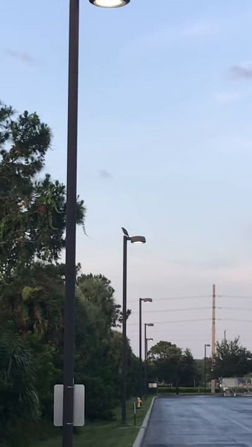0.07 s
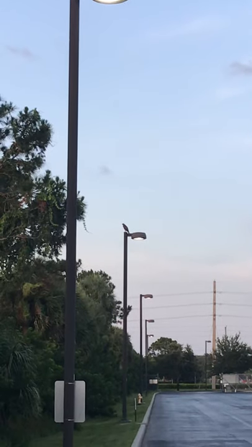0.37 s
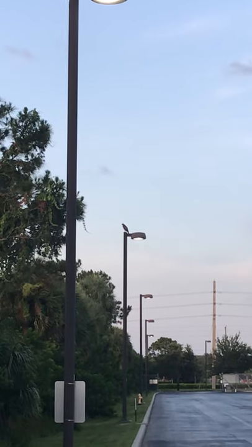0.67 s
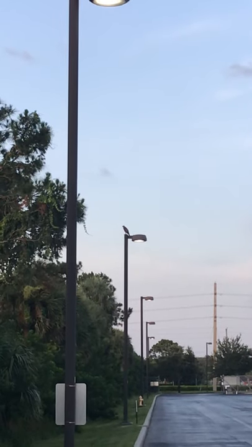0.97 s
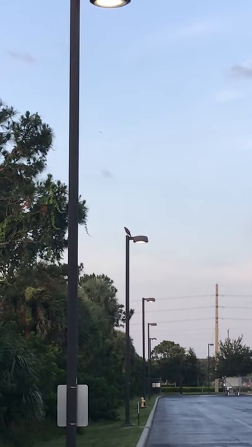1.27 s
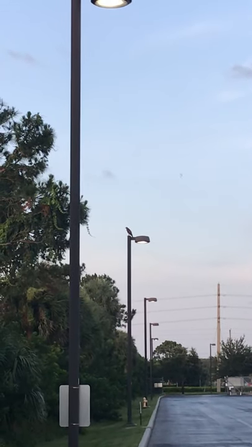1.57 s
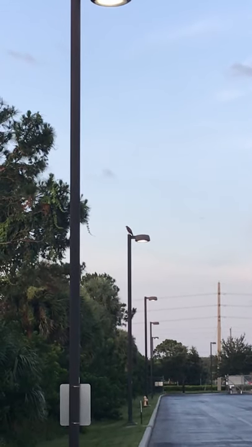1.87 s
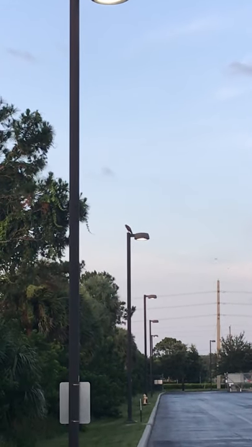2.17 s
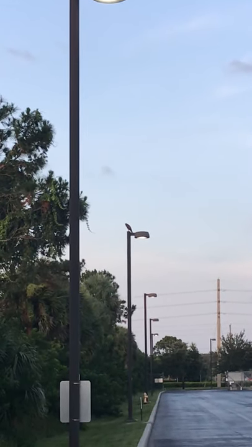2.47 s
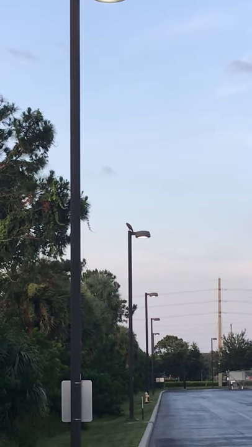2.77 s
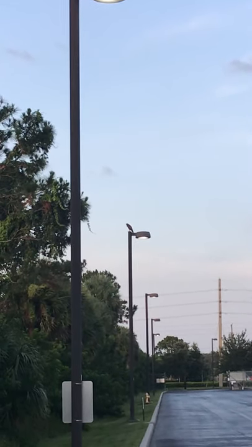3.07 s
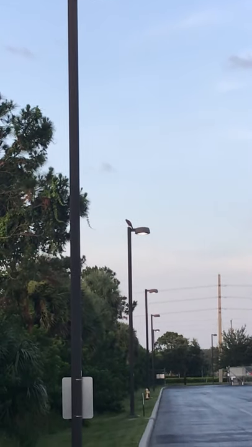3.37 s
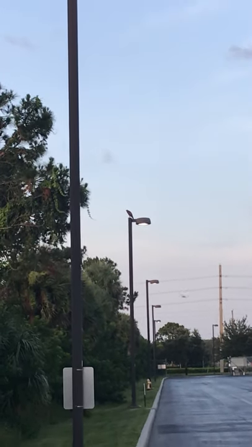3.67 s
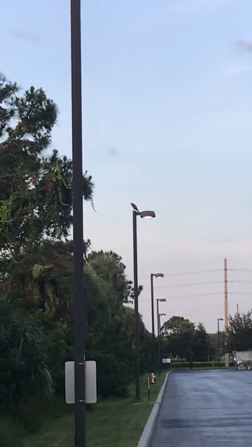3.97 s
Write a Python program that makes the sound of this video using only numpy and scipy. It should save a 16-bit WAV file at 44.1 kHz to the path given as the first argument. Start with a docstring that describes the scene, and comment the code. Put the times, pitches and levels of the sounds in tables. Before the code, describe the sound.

In an outdoor parking area, small birds give falling whistles and short chirps, then a hawk lets out one long, raspy scream. The calls echo lightly off the trees while distant traffic rumbles and a machine hums.

```python
"""Small birds slur, chip and rasp in the trees by a parking area; then a hawk screams from a lamp post.
Its one long scream is a clear upward yelp that breaks into a hoarse hiss, coloured by the bounce
off the asphalt. The birds are falling whistles and buzzing noise, and all calls echo off the trees.
Distant traffic rumbles, an engine drones and a machine hums under it all, in mono."""
import sys
import numpy as np
from scipy import signal
from scipy.fft import rfft, irfft
from scipy.io import wavfile
from scipy.ndimage import map_coordinates

SR = 44100
rng = np.random.default_rng(int(sys.argv[2]) if len(sys.argv) > 2 else 0)


def file_out(sig):
    """Save sig as 16-bit WAV at sys.argv[1]."""
    # one column per channel
    cols = np.atleast_2d(sig).T
    # limit, then scale
    lim = np.clip(cols, -1, 1)
    pcm = np.round(lim * 32767).astype(np.int16)
    wavfile.write(sys.argv[1], SR, pcm)


N = 176400
T = np.arange(N) / SR


def amp(db):
    """Decibels to gain."""
    return 10 ** (np.asarray(db) / 20)


def unit(x):
    """Scales to rms 1."""
    return x / np.sqrt(np.mean(x ** 2) + 1e-20)


def curve(rows, t):
    """Each column after the first, linearly interpolated at t."""
    at, *columns = np.transpose(rows)
    return [np.interp(t, at, column) for column in columns]


def at_freq(points, hz):
    """Interpolates a table on a log-frequency axis."""
    freq_hz, value = np.transpose(points)
    return np.interp(np.log(hz + 1), np.log(freq_hz), value)


def noise(spectrum, tilt_db_per_octave=0):
    """Noise of rms 1 with the given spectral shape."""
    hz = np.fft.rfftfreq(N, 1 / SR)
    gain = amp(at_freq(spectrum, hz) + tilt_db_per_octave * np.log2(hz + 1))
    return unit(irfft(rfft(rng.standard_normal(N)) * gain, N))


def drift(rate_hz):
    """Random motion of rms 1, up to about the given rate."""
    hz = np.fft.rfftfreq(N, 1 / SR)
    return unit(irfft(rfft(rng.standard_normal(N)) / np.sqrt(1 + (hz / rate_hz) ** 4), N))


def phase(hz):
    """Running phase of a frequency curve."""
    return 2 * np.pi * np.cumsum(hz) / SR


def band(hz, width_hz):
    """Noise in a resonance that follows a frequency curve."""
    envelope = (drift(width_hz / 2) + 1j * drift(width_hz / 2))[:len(hz)]
    return unit((envelope * np.exp(1j * phase(hz))).real)


def add(mix, start_s, sound):
    """Mixes a sound in at its start time."""
    part = mix[max(round(start_s * SR), 0):][:len(sound)]
    part += sound[:len(part)]


# voice harmonics, fundamental first: gain_db
HARMONICS_DB = [3, -13.5, -30, -63]
# second syrinx tone in the yelp: time_s, pitch_hz, gain_db
SECOND_TONE = [(2.24, 2190, -22), (2.28, 2110, -14), (2.32, 1880, -8), (2.35, 1670, -11), (2.39, 1540, -40)]


def hawk_voice(pitch_hz, roughness, hoarse):
    """The syrinx: a jittering whistle, with stronger overtones and brief sum tones in the yelp."""
    jitter, wobble = 0.04 * drift(rate_hz=461), 0.011 * drift(rate_hz=48.6)
    main_phase = phase(pitch_hz * (1 + roughness * (jitter + wobble)))
    overtone_gain = amp(6.5 * (1 - hoarse)) * (1 + 0.32 * hoarse * drift(rate_hz=35))
    harmonics = sum(amp(db) * (overtone_gain if k else 1) * np.sin((k + 1) * main_phase)
                    for k, db in enumerate(HARMONICS_DB))
    second_hz, second_db = curve(SECOND_TONE, T)
    second_phase = phase(second_hz * (1 + 0.065 * drift(rate_hz=570)))
    sum_tones = sum(amp(db + second_db) * np.sin(harmonic * main_phase + second_phase)
                    for harmonic, db in [(1, 1), (2, -6)])
    return unit(harmonics + sum_tones)


# scream contour: time_s, pitch_hz, voice_db, hiss_db, roughness_ratio
SCREAM = [(2.22, 2350, -76, -82, 0.26), (2.245, 3023, -42, -49.5, 0.37), (2.27, 3188, -40, -45, 0.2),
          (2.303, 3246, -35.5, -47.5, 0), (2.325, 3189, -50.5, -47, 0.04), (2.355, 3092, -37, -51.5, 0.2),
          (2.385, 3011, -49, -51.5, 0.84), (2.55, 3041, -50, -55, 0.65), (2.72, 3047, -50, -55.5, .7),
          (2.82, 3080, -43, -56, 0.37), (2.93, 3053, -45.5, -55, 0.47), (3.1, 3065, -46.5, -55.5, 0.46),
          (3.42, 3083, -45, -56.5, 0.42), (3.62, 3037, -48.5, -58, 0.47), (3.86, 3050, -47, -58, .5),
          (3.91, 2910, -53.5, -59, .3), (3.945, 2690, -75, -80, 0.52)]
# hoarse resonances at the median pitch: centre_hz, width_hz, level_db
RASP_BANDS = [(1501, 118, -68.5), (2219, 205, -62)]
# hiss spectrum: freq_hz, density_db
HISS_SPECTRUM = [(500, -40), (900, 0), (1700, -9.5), (2400, 5), (2800, -1), (3400, 2), (4000, 3.5),
                 (5400, 3.5), (6900, 5), (7500, -2.5), (8200, -7), (8900, 0), (9600, -12.5), (11600, -12),
                 (15500, -24)]
YELP_END_S, YELP_BREAK_S, SCREAM_RAMP_S = 2.37, 0.01, 0.018


def hawk():
    """A bright yelp turns hoarse: the voice in fluttering hiss, over two low rasping resonances."""
    pitch_hz, voice_db, hiss_db, roughness = curve(SCREAM, T)
    start_s, end_s = SCREAM[0][0], SCREAM[-1][0]
    gate = np.clip(np.minimum(T - start_s, end_s - T) / SCREAM_RAMP_S, 0, 1)
    hoarse = 0.5 + 0.5 * np.tanh((T - YELP_END_S) / YELP_BREAK_S)
    voice = amp(voice_db) * hawk_voice(pitch_hz, roughness, hoarse)
    flutter = drift(rate_hz=102)
    shimmer_depth = 0.16 * roughness
    shimmer = np.exp(shimmer_depth * (flutter - shimmer_depth))
    pitch_ratio = pitch_hz / np.median(pitch_hz[gate > 0])
    rasp = hoarse * sum(amp(db) * band(hz * pitch_ratio, width_hz) for hz, width_hz, db in RASP_BANDS)
    yelp_hiss = np.sqrt(1 - hoarse) * noise(HISS_SPECTRUM, tilt_db_per_octave=3)
    hoarse_hiss = np.sqrt(hoarse) * noise(HISS_SPECTRUM)
    hiss = amp(hiss_db) * (yelp_hiss + hoarse_hiss)
    return gate * (voice * shimmer + (hiss + rasp) * (1 + 0.073 * flutter))


# lag of the asphalt reflection: time_s, delay_ms
BOUNCE_DELAY = [(2.3, 1.457), (3.2, 1.452), (3.9, 1.472)]
BOUNCE_GAIN = 0.62


def ground_bounce(direct):
    """The direct sound plus its slightly later reflection: a comb of peaks and notches."""
    delay_samples = curve(BOUNCE_DELAY, T)[0] * SR / 1000
    return direct + BOUNCE_GAIN * map_coordinates(direct, [np.arange(N) - delay_samples], order=5)


# songbird whistles: start_s, level_db, jitter_ratio
SLURS = [(.105, -58.5, 0.0047), (.172, -60, 0.031), (.527, -60, 0.0089), (.598, -57, 0.0095),
         (.938, -57, 0.0037), (1.01, -56, 0.019), (1.362, -59.5, 0.0049), (1.431, -59, .02),
         (1.712, -67.5, .004), (3.894, -58, 0.0036)]
# contour of one whistle: offset_s, pitch_hz, gain_db
SLUR_CONTOUR = [(0, 6150, -30), (.008, 5900, -6), (.03, 5150, -11.5), (.058, 4240, -7), (.085, 3050, -5),
                (.1, 2720, -12), (.135, 2560, -15), (.18, 2200, -11), (.2, 2150, -33)]


def slurs():
    """A songbird's thin whistles, each sweeping steeply down."""
    out, t = np.zeros(N), np.arange(0, SLUR_CONTOUR[-1][0], 1 / SR)
    contour_hz, gain_db = curve(SLUR_CONTOUR, t)
    for start_s, level_db, jitter in SLURS:
        pitch_hz = contour_hz * (1 + jitter * drift(rate_hz=280)[:len(t)])
        add(out, start_s, amp(level_db + gain_db) * np.sin(phase(pitch_hz)))
    return out


# whistle contour: time_s, pitch_hz, level_db
SLOW_WHISTLE = [(1.87, 3550, -85), (1.9, 3490, -72), (1.99, 3170, -72), (2.04, 2730, -75),
                (2.08, 2540, -69)]


def slow_whistle():
    """One fainter whistle that falls slowly."""
    pitch_hz, level_db = curve(SLOW_WHISTLE, T)
    gate = (T > SLOW_WHISTLE[0][0]) * (T < SLOW_WHISTLE[-1][0])
    return gate * amp(level_db) * np.sin(phase(pitch_hz))


# chip notes: start_s, level_db, pitch_hz
CHIPS = [(.018, -57, 3200), (1.268, -56.5, 3390), (1.336, -52.5, 3210), (1.694, -62.5, 3250),
         (1.937, -54.5, 3220), (2.097, -60.5, 3400)]
CHIP_S, CHIP_FALL_RATIO, CHIP_TONE_DB, CHIP_FIZZ_DB = 0.033, 0.043, -3, -17


def chips():
    """Short buzzy notes that fall a little: a tone in narrow noise, with a faint wide fizz."""
    out, progress = np.zeros(N), np.arange(0, CHIP_S, 1 / SR) / CHIP_S
    for start_s, level_db, mid_hz in CHIPS:
        pitch_hz = mid_hz * (1 - CHIP_FALL_RATIO * (progress - 0.5))
        note = unit(band(pitch_hz, width_hz=780) + amp(CHIP_TONE_DB) * np.sin(phase(pitch_hz)))
        fizz = amp(CHIP_FIZZ_DB) * band(2 * pitch_hz, width_hz=6300)
        add(out, start_s, amp(level_db) * np.sin(np.pi * progress) * (note + fizz))
    return out


# harsh calls: start_s, length_s, level_db
SQUAWKS = [(0.429, 0.28, -54.5), (3.467, 0.27, -51)]
# call body spectrum: freq_hz, density_db
BODY_SPECTRUM = [(1200, -38), (2000, -2), (2700, -9), (3400, 0), (4050, 7), (4600, -7.5), (8200, -15),
                 (15000, -39)]
# call onset spectrum: freq_hz, density_db
SPLASH_SPECTRUM = [(1500, -11), (2500, 5), (5000, -7), (8400, -1), (10400, -17), (12000, -11), (15000, -24)]
BODY_RAMP_S, BODY_FADE_DB = 0.04, -7
SPLASH_RAMP_S, SPLASH_DB, SPLASH_FADE_DB = 0.022, -4, -29
BUZZ_HZ, BUZZ_DEPTH = 85.3, 0.28


def squawks():
    """Another bird's buzzing rasps: resonant noise under a bright splash that fades sooner."""
    out = np.zeros(N)
    for start_s, length_s, level_db in SQUAWKS:
        t = np.arange(0, length_s, 1 / SR)
        edge_s, progress = np.minimum(t, length_s - t), t / length_s
        buzz_hz = BUZZ_HZ * (1 + 0.091 * drift(rate_hz=30)[:len(t)])
        buzz = 1 + BUZZ_DEPTH * np.sin(phase(buzz_hz))
        body = amp(BODY_FADE_DB * progress) * noise(BODY_SPECTRUM)[:len(t)]
        body *= np.clip(edge_s / BODY_RAMP_S, 0, 1)
        splash = amp(SPLASH_DB + SPLASH_FADE_DB * progress) * noise(SPLASH_SPECTRUM)[:len(t)]
        splash *= np.clip(edge_s / SPLASH_RAMP_S, 0, 1) ** 2
        add(out, start_s, amp(level_db) * buzz * (body + splash))
    return out


# tree line decay: freq_hz, t60_s
TREE_DECAY = [(500, 0.82), (3000, 0.51), (6000, 0.21), (14000, 0.4)]
ECHOES_PER_S, PREDELAY_S = 2000, 0.012


def tree_echo(sound):
    """Scattered echoes off the tree line; the lows ring longest."""
    taps = rng.standard_normal(SR) * (rng.random(SR) < ECHOES_PER_S / SR) * (T[:SR] > PREDELAY_S)
    hz, t, spectra = signal.stft(taps, SR, nperseg=256)
    decay = amp(-60 * t / at_freq(TREE_DECAY, hz)[:, None])
    tail = signal.istft(spectra * decay, SR, nperseg=256)[1]
    return signal.fftconvolve(sound, tail / np.linalg.norm(tail))[:N]


# traffic and open air spectrum: freq_hz, density_db
RUMBLE_SPECTRUM = [(20, -10), (36, -28), (52, 0), (66, 3), (85, -4), (120, -2), (155, -11.5), (200, -14),
                   (330, -19.5), (460, -27.5), (700, -24), (1100, -26.5), (1600, -33.5), (2300, -38.5),
                   (3200, -41), (5000, -47.5), (6800, -47.5), (7700, -53), (8500, -49), (10400, -56),
                   (13200, -52), (15600, -57)]
# traffic wash spectrum: freq_hz, density_db
WASH_SPECTRUM = [(300, -28), (600, -4.5), (900, 2), (1300, -6), (2000, -9), (4000, -41)]
# traffic wash envelope: time_s, level_db
WASH_LEVEL = [(0, -86), (2.0, -73), (2.4, -61), (3.6, -72.5), (3.85, -56.5), (4, -59.5)]


def traffic():
    """Distant traffic: a gently heaving rumble and a faint wash that grows toward the end."""
    rumble = amp(-45) * noise(RUMBLE_SPECTRUM) * (1 + 0.08 * drift(rate_hz=2.3))
    wash = amp(curve(WASH_LEVEL, T)[0]) * noise(WASH_SPECTRUM)
    return rumble + wash


# drone envelope: time_s, level_db
DRONE_LEVEL = [(0, -53), (.47, -52), (.56, -41), (1.15, -42), (1.25, -52), (4, -51.5)]
DRONE_HZ = 70.53


def engine_drone():
    """A distant engine: one low wavering tone that swells once."""
    pitch_hz = DRONE_HZ * (1 + 0.016 * drift(rate_hz=3.1))
    return amp(curve(DRONE_LEVEL, T)[0]) * unit(np.sin(phase(pitch_hz)))


# main hum line envelope: time_s, level_db
MAIN_HUM_LEVEL = [(0.0, -54), (0.11, -54), (0.49, -56.5), (1.32, -51), (1.73, -58.5), (2.72, -51),
                  (3.48, -59), (3.49, -56.5), (4.0, -53.5)]
# weaker hum lines: pitch_hz, level_db
WEAK_HUM_LINES = [(258.5, -70.5), (388, -74), (598, -70), (687, -73.5), (895, -73), (1195, -81)]
MAIN_HUM_HZ = 299.1


def machine_hum():
    """Tones that waver together with the machine's speed; the main one swells and sinks."""
    speed = 1 + 0.00438 * drift(rate_hz=7.6)
    lines = [(MAIN_HUM_HZ, curve(MAIN_HUM_LEVEL, T)[0])] + WEAK_HUM_LINES
    return sum(amp(db) * unit(np.sin(phase(hz * speed)) * (1 + 0.071 * drift(rate_hz=1.7)))
               for hz, db in lines)


def scene():
    """Hawk, small birds, their echo and the background, the same in both channels."""
    scream = ground_bounce(hawk())
    song = slurs() + slow_whistle()
    calls = chips() + squawks()
    echo = tree_echo(amp(-7.5) * scream + amp(-4.5) * song + amp(-13) * calls)
    mono = scream + song + calls + echo + traffic() + engine_drone() + machine_hum()
    return np.array([mono, mono])


def record(dry):
    """A steep low-pass removes the highest treble."""
    cutoff_hz = 15740
    lowpass = signal.firwin(1023, cutoff_hz, window=("kaiser", 9), fs=SR)
    return signal.oaconvolve(dry, lowpass[None], "same")


dry = scene()
out = record(dry)
file_out(out)
```